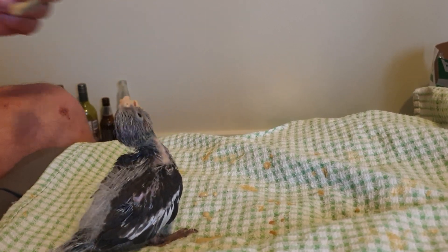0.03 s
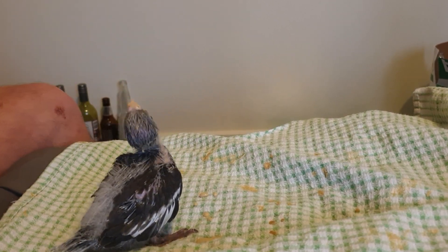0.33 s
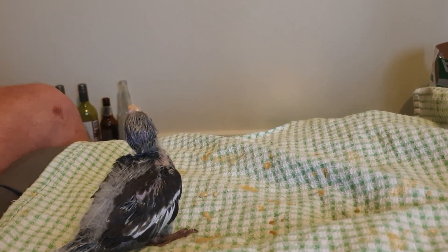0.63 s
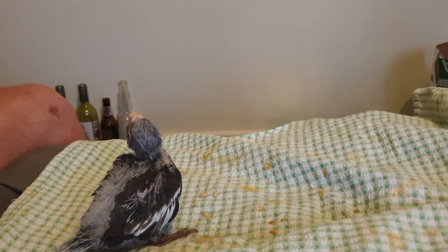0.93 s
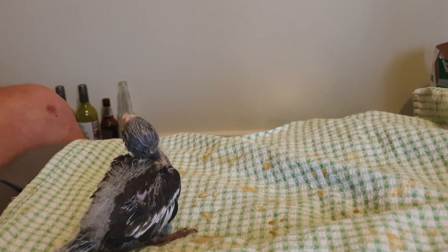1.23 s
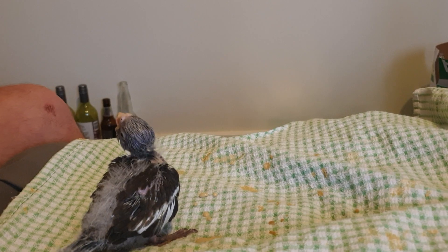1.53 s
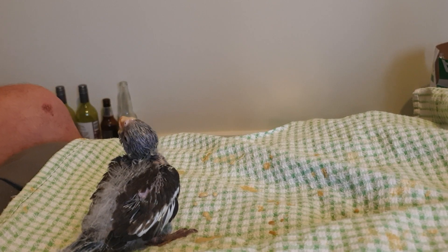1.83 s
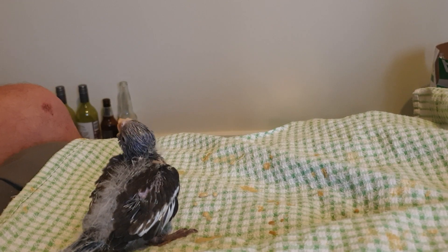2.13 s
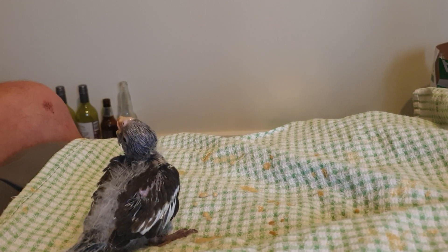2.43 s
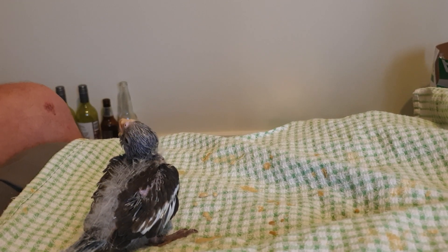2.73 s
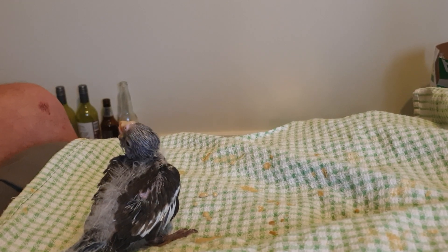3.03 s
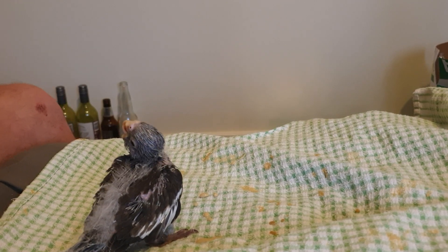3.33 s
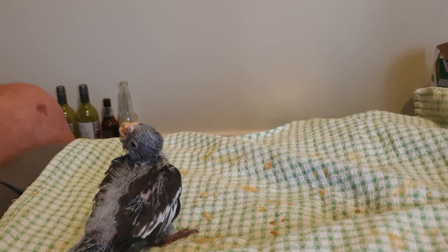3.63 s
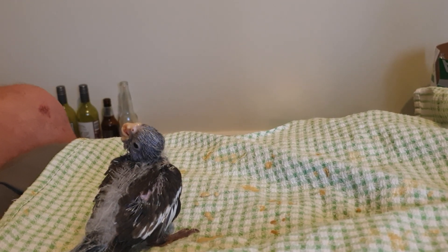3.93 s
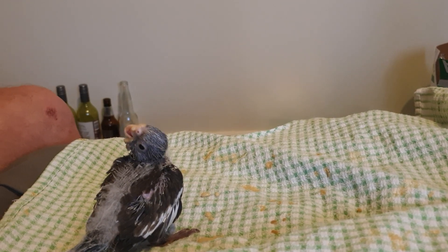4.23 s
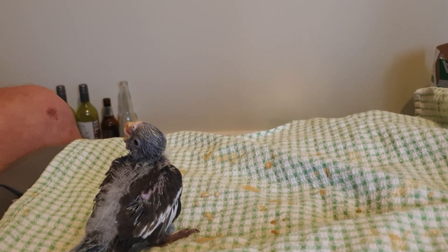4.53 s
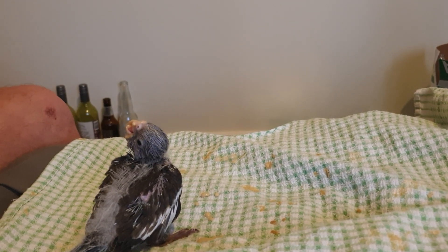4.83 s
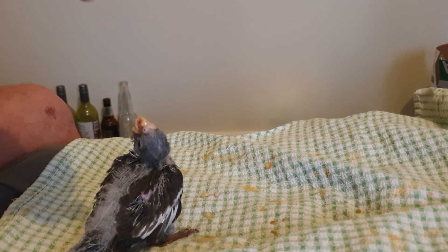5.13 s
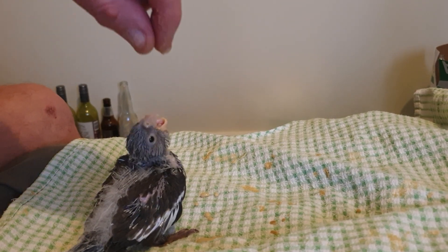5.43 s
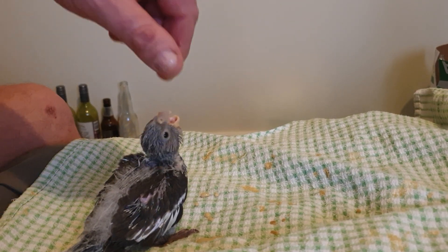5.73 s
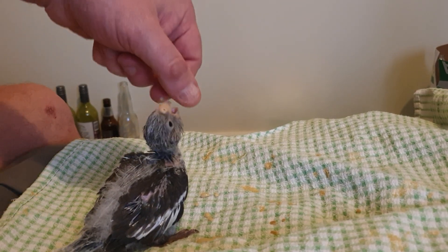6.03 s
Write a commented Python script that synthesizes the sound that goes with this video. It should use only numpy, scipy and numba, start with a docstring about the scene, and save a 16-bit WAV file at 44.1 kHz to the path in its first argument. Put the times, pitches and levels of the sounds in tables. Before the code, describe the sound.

A cockatiel chick begs close to the microphone in a small furnished room. A few short rasps come first, with a light clink of a small hard object. Then long, harsh, hissing calls follow one after another, separated by quick gasps. A dull knock on furniture sounds early in the run, a softer thud later, and a faint low hum slowly grows underneath.

```python
"""A cockatiel chick begs for food on a towel in a small room, close to a stereo microphone.
Its syrinx slaps shut irregularly, faster with more effort, and rings the windpipe and the beak
in long rasping strokes, with quick gasps between them. Around it a small hard thing clinks,
something knocks on the furniture, the bedding shifts, and a low hum hangs in the room."""
import sys
import numpy as np
from scipy import signal
from scipy.fft import rfft, irfft
from scipy.io import wavfile
from scipy.ndimage import uniform_filter1d, map_coordinates
from numba import njit

SR = 44100
rng = np.random.default_rng(int(sys.argv[2]) if len(sys.argv) > 2 else 0)


def materialize(psi):
    """Save the field psi as 16-bit PCM at rate SR to the path in sys.argv[1].

    A 1-D psi becomes a single channel; in a 2-D psi each row is a channel.
    """
    bounded = np.clip(np.atleast_2d(psi).T, -1, 1)
    quanta = np.round(bounded * 32767).astype(np.int16)
    wavfile.write(sys.argv[1], SR, quanta)


N = 268172
T = np.arange(N) / SR


def undb(db):
    """Decibels to gain."""
    return 10 ** (np.asarray(db) / 20)


def unit(x):
    """Scale to rms 1."""
    return x / np.sqrt(np.mean(x ** 2))


def curves(rows):
    """Each column after the first as a line through time."""
    times, *columns = np.transpose(rows)
    return [np.interp(T, times, column) for column in columns]


def latest(rows):
    """At every moment, the time since the latest event began and that event's other columns."""
    start, *columns = np.transpose(rows)
    which = np.maximum(np.searchsorted(start, T) - 1, 0)
    return [np.maximum(T - start[which], 0)] + [column[which] for column in columns]


def fade(start, t60):
    """Exponential decay from a moment on."""
    return (T >= start) * np.exp(-np.log(1000) * np.maximum(T - start, 0) / t60)


def colour(x, points, size=8192):
    """Minimum-phase filter through points of f/Hz, gain/dB."""
    hz, db = np.transpose(points)
    grid = np.maximum(np.arange(size // 2 + 1) * SR / size, 1)
    gain = undb(np.interp(np.log(grid), np.log(hz), db))
    cepstrum = irfft(np.log(gain))
    cepstrum[1:size // 2] *= 2
    cepstrum[size // 2 + 1:] = 0
    return signal.fftconvolve(x, irfft(np.exp(rfft(cepstrum))))[:len(x)]


@njit
def bandpass(x, hz, width):
    """State-variable band-pass whose centre and width may move every sample."""
    y, band, low = np.empty(len(x)), 0., 0.
    for i in range(len(x)):
        g, damping = np.tan(np.pi * hz[i] / SR), width[i] / hz[i]
        v = (band + g * (x[i] + 1e-18 - low)) / (1 + g * (g + damping))
        band, low = 2 * v - band, low + 2 * g * v
        y[i] = damping * v
    return y


def resonance(x, hz, width_hz, order=2):
    """A resonance made steep by repeating it, rms 1."""
    for _ in range(order):
        x = bandpass(x, hz * np.ones(N), width_hz * np.ones(N))
    return unit(x)


def struck(blows, modes):
    """Each blow rings the same decaying modes."""
    ring = sum(undb(db) * fade(0, t60) * np.sin(2 * np.pi * hz * T) for hz, db, t60 in modes)
    taps = np.zeros(N)
    for start, db, *_ in blows:
        taps[int(start * SR)] += undb(db)
    return signal.fftconvolve(taps, ring)[:N]


def place(x, lag, pan_db):
    """A near source at the microphone: the right side lags by `lag` samples and is pan_db softer."""
    right = map_coordinates(x, [np.arange(N) - lag], order=3, mode="nearest")
    return np.array([x * undb(pan_db / 2), right * undb(-pan_db / 2)])


def room(x, wet_db, t60, first_s=0.000708):
    """Reflections of a small furnished room, different on each side of the microphone."""
    walls = [(100, -8.5), (700, -2.0), (2000, -1.5), (6000, -2.5), (14000, -4.0)]  # f/Hz, gain/dB
    tails = [colour((rng.standard_normal(N) * fade(first_s, t60))[:SR // 2], walls) for _ in range(2)]
    return undb(wet_db) * np.array([signal.fftconvolve(x, h / np.linalg.norm(h))[:N] for h in tails])


def room_tone(db=-70, side_db=-9):
    """Still air, mostly alike on both sides."""
    # spectrum of the air: f/Hz, relative level/dB
    spectrum = [(25, -7), (70, 6.5), (130, 2), (250, -7), (500, -11.5), (1000, -14.5), (3000, -20),
                (6500, -26), (8300, -52), (10500, -21), (15000, -25)]
    mid, side = (unit(colour(rng.standard_normal(N), spectrum)) for _ in range(2))
    return undb(db) * (mid + undb(side_db) * side * np.array([[1], [-1]]))


def hum():
    """Narrow bands of low noise waver and slowly grow."""
    # tones of the hum: f/Hz, width/Hz, relative level/dB
    tones = [(50.5, 3.2, 0), (81.8, 14.4, -2.5), (100.5, 10, -8)]
    # its swell: t/s, level/dB
    swell = [(0.0, -72.5), (3.1, -68.5), (3.9, -65), (6.08, -55.5)]
    drone = sum(undb(db) * resonance(rng.standard_normal(N), hz, width) for hz, width, db in tones)
    return unit(drone) * undb(curves(swell)[0])


def bedding():
    """The bedding shifts with a soft, low rub."""
    # course of the rub: t/s, level/dB
    shift = [(3.7, -85), (3.92, -62.5), (4.06, -60), (4.13, -54.5), (4.18, -61), (4.26, -88)]
    return resonance(rng.standard_normal(N), hz=146, width_hz=132) * undb(curves(shift)[0])


def knocks():
    """Dull blows make the furniture boom; softer contact gives less treble."""
    # blows: t/s, level/dB, t60/s, low-pass f/Hz
    blows = [(1.853, -37.5, 0.1, 1890), (1.861, -35.5, 0.1, 1700), (1.873, -42.5, 0.43, 1500),
             (3.402, -48.5, 0.25, 149), (3.421, -62, 0.79, 218.1), (3.55, -56.5, 0.45, 100)]
    # spectrum of the thud: f/Hz, relative level/dB
    spectrum = [(35, -16), (60, -12), (90, 6.5), (130, -3.5), (180, 1), (300, -7.5), (450, -3), (620, -3),
                (1200, 1.5), (1500, -1.5), (1850, 8.5), (3000, -40)]
    # furniture modes: f/Hz, gain/dB, t60/s
    modes = [(99, -22, 0.16), (179, -13, 0.21), (241, -14, 0.15), (298, -17.5, 0.35), (434, -16, 0.14)]
    body = colour(rng.standard_normal(N), spectrum)
    thuds = np.zeros(N)
    for start, db, t60, top_hz in blows:
        soft = signal.butter(3, top_hz, fs=SR, output="sos")
        thud = signal.sosfilt(soft, body * fade(start, t60))
        thuds += undb(db) * thud / np.std(signal.sosfilt(soft, body))
    return thuds + struck(blows, modes)


def clinks():
    """A small hard thing taps and rattles, ringing faintly."""
    # taps: t/s, level/dB, t60/s
    taps = [(0.409, -57, 0.0093), (0.4815, -40, 0.013), (0.5741, -36.5, 0.033), (0.583, -54, 0.14),
            (0.594, -43.5, 0.097), (0.607, -50, .04), (0.619, -55, 0.21)]
    # spectrum of the contact: f/Hz, relative level/dB
    spectrum = [(600, -53), (1100, -21), (1600, -27), (2700, -19.5), (3100, -21), (3850, -7.5), (4900, -12),
                (6000, -11.5), (7200, -7.5), (8500, -20), (10700, -9.5), (13000, -11), (15500, -15.5)]
    # ringing modes: f/Hz, gain/dB, t60/s
    modes = [(1110, -28, 0.085), (2666, -28, 0.19), (4420, -22, 0.33), (6300, -30, 0.16), (6800, -29, 0.13),
             (11300, -44, 0.17)]
    contact = sum(undb(db) * fade(start, t60) for start, db, t60 in taps)
    return contact * unit(colour(rng.standard_normal(N), spectrum)) + struck(taps, modes)


def whistles(waver_hz=110):
    """Thin, unsteady whistles, and the chirps of the throat snapping shut."""
    # glides: t/s, length/s, start f/Hz, end f/Hz, level at half the peak amplitude/dB
    glides = [(0.0, 0.075, 2360, 2260, -61.5), (0.629, .028, 2560, 2380, -62),
              (2.396, 0.0064, 3475, 3280, -44), (2.572, 0.028, 12700, 11700, -68),
              (2.682, 0.15, 11400, 12500, -69), (4.35, 0.22, 12500, 14500, -67),
              (4.966, 0.0056, 3410, 3200, -40.5), (5.79, 0.0049, 3150, 3000, -45)]
    out = np.zeros(N)
    wobble = waver_hz * unit(uniform_filter1d(rng.standard_normal(N), size=60))
    for start, length, from_hz, to_hz, db in glides:
        along = np.clip((T - start) / length, 0, 1)
        hz = from_hz + (to_hz - from_hz) * along + wobble
        out += undb(db) * 2 * np.sin(np.pi * along) * np.sin(2 * np.pi * np.cumsum(hz) / SR)
    return out


def syrinx(rate_hz, jitter, scatter_db):
    """The syrinx slaps shut unevenly; gives the pulses and the seconds since the last one."""
    gap_draw, size_draw = rng.standard_normal((12000, 2)).T
    at = [0.]  # in samples
    while at[-1] < N:
        now = int(at[-1])
        at.append(at[-1] + SR / rate_hz[now] * np.exp(jitter[now] * gap_draw[len(at)]))
    at = np.array(at[:-1])
    size = undb(scatter_db * size_draw[:len(at)]) / np.sqrt(rate_hz[at.astype(int)])
    # a windowed sinc sets each slap between samples
    taps = at.astype(int)[:, None] + np.arange(-3, 5)
    offset = taps - at[:, None]
    shape = np.sinc(offset) * np.sinc(offset / 4)
    pulses = np.bincount(np.clip(taps, 0, N - 1).ravel(), (size[:, None] * shape).ravel(), N)
    last = np.maximum(np.searchsorted(at, np.arange(N)) - 1, 0)
    return -unit(pulses), np.abs(T - at[last] / SR)


def chick(gate, db, throat_hz, throat_db, upper_db, mouth_hz, mouth_db,
          beak_hz, beak_db, hiss_db, sizzle_hz, sizzle_db):
    """Slaps and puffs ring the fixed windpipe and moving throat, mouth and beak; gives voice, hiss."""
    # the harder the push, the faster the slaps: level/dB, slap rate/Hz
    effort = [(-58, 500), (-49.5, 620), (-45.5, 690), (-43, 830)]
    # windpipe response: f/Hz, relative gain/dB
    windpipe_response = [(250, -26), (520, -56.5), (800, -10.5), (1120, -6.5), (1400, 0.5), (1700, -2),
                         (2020, -0.5), (2350, -3.5), (2720, -7), (3150, -4.5), (3700, -10.5), (5000, -16.5),
                         (8000, -48)]
    # air hiss at the beak tip: f/Hz, relative level/dB
    hiss_spectrum = [(4000, -25), (5300, 9), (6800, 12), (8500, 4.5), (9500, 11), (10500, 6.5),
                     (11500, 11.5), (12500, 3), (13500, 1), (15500, 0.5)]
    # a soft call buzzes almost evenly; pushed hard, the beat breaks up
    jitter = np.interp(db, [-48.5, -44.5], [.17, .36])
    pulses, since_s = syrinx(np.interp(db, *np.transpose(effort)), jitter, scatter_db=1.5)
    puffs, eddies = (unit(np.exp(-since_s / 0.0026) * rng.standard_normal(N)) for _ in range(2))
    source = pulses + .5 * puffs
    throat = undb(throat_db) * resonance(source, throat_hz, width_hz=480, order=3)
    upper_throat = undb(upper_db) * resonance(eddies, 2.202 * throat_hz, width_hz=620)
    windpipe = unit(unit(colour(source, windpipe_response)) - throat + upper_throat)
    # a narrower gape rings lower and more sharply
    mouth_width = np.interp(mouth_hz, [3300, 4200], [1150, 1550])
    mouth = undb(mouth_db) * resonance(source / np.sqrt(mouth_width), mouth_hz, mouth_width, order=4)
    # the beak's resonance loses more energy, and so broadens, as it rises
    beak_width = np.interp(beak_hz, [5900, 6800], [1950, 2600])
    beak = undb(beak_db) * resonance(source / np.sqrt(beak_width), beak_hz, beak_width, order=4)
    # air torn at the beak tip hisses, with one sizzling band
    jet = puffs + 0.7 * pulses
    sizzle = undb(sizzle_db) * resonance(eddies, sizzle_hz, width_hz=2800)
    hiss = unit(colour(jet, hiss_spectrum)) + sizzle
    hiss *= undb(hiss_db) / np.hypot(1, undb(sizzle_db))
    return np.array([windpipe + mouth + beak, hiss]) * undb(db) * gate


def gasps(attack_s=.0005, hold_s=.022, sink_s=0.039, sink_hz=220):
    """Gulps of air between strokes burst open, hold briefly and fade as the mouth resonance sinks."""
    # gulps: t/s, level/dB, fade/(dB/s), mouth f/Hz, mouth gain/dB, beak f/Hz, beak gain/dB, hiss gain/dB
    gulps = [(1.610, -45.5, 240, 3145, -1.5, 6500, -12, -29), (2.507, -49, 230, 3300, -2, 5700, -37, -22),
             (3.323, -46, 85, 3500, -2, 5400, -21, -21.5), (4.201, -43, 150.5, 4083, -3.5, 5500, -14, -27),
             (5.078, -44, 199, 4200, -1.5, 5400, -8.5, -21), (5.904, -43, 216.5, 4540, -2, 5870, -5, -21)]
    age, db, fade_db_per_s, mouth_hz, mouth_db, beak_hz, beak_db, hiss_db = latest(gulps)
    gate = np.minimum(age / attack_s, 1)
    fading_s = np.maximum(age - hold_s, 0)
    sunk = np.minimum(fading_s / sink_s, 1)
    return chick(gate, db - fade_db_per_s * fading_s, throat_hz=702, throat_db=-13, upper_db=-2,
                 mouth_hz=mouth_hz - sink_hz * sunk, mouth_db=mouth_db,
                 beak_hz=beak_hz, beak_db=beak_db, hiss_db=hiss_db, sizzle_hz=11300, sizzle_db=5)


def rasps(gape_s=.11, beak_late_s=0.046, settle_s=0.28, catch_s=.004, catch_db=3.5):
    """Begging strokes swell and brighten as the gape widens, and catch as the throat snaps shut."""
    # strokes: start t/s, end t/s, full level/dB, attack/s, release/s, open throat f/Hz,
    # open mouth f/Hz, mouth gain/dB, settled beak f/Hz, beak sag/Hz, beak gain/dB, hiss gain/dB,
    # sizzle f/Hz, sizzle against hiss/dB
    strokes = [(0.036, 0.19, -45.5, 0.012, 0.066, 693, 4624, -1, 6150, 4, -3, -20.5, 10700, 3),
               (0.322, 0.408, -51.5, 0.024, 0.02, 702, 3400, -2, 6350, -14, -9.5, -28, 11000, -10),
               (0.416, 0.484, -50, 0.0029, 0.027, 705, 4004, 3.5, 6070, 0, -1, -28.5, 11000, -17),
               (0.773, 0.812, -60.5, 0.0059, 0.036, 950, 2600, 11, 6200, -4, -20, -26, 11000, -6),
               (0.830, 1.510, -44.5, 0.027, 0.0058, 934, 4260, -1.5, 5860, 450, -1.5, -18.5, 12150, 2),
               (1.694, 2.402, -44.5, 0.011, 0.001, 910, 4220, -1.5, 5690, 952, -3.5, -21, 12400, 0.5),
               (2.620, 3.212, -44.5, 0.022, 0.0035, 932, 4342, -1.5, 5749, 550, -6, -21, 12300, -1),
               (3.395, 4.100, -44, 0.023, 0.0023, 863, 4330, -1.5, 5850, 800, -5, -21.5, 12000, -3),
               (4.255, 4.975, -43.5, 0.028, 0.0019, 863, 4530, -2.5, 5980, 900, -6.5, -21.5, 12500, -1.5),
               (5.115, 5.797, -43, 0.021, 0.0011, 775, 4260, -4, 5400, -23, -8.5, -18, 11600, 6),
               (5.935, 6.100, -43, 0.022, .002, 770, 4850, -2.5, 6700, -600, -2, -18, 11500, -1)]
    # the chick turns and stretches to the hand, which bends its resonances:
    # t/s, mouth f ratio, mouth lift/dB, beak f ratio, beak lift/dB, hiss lift/dB, sizzle lift/dB
    stretch = [(5.27, 0.96, 0, 1.04, 1, 1.5, -4), (5.38, .88, 1.5, 0.93, -1.5, 2.5, -5),
               (5.47, 0.82, -8, 0.54, 6, 5.5, -9), (5.54, 0.81, -9, 0.67, 4, 2.5, -5),
               (5.595, 0.61, -10, 0.97, 5, 3, -9), (5.65, 0.66, -12, 1.245, 4.5, -5, -23),
               (5.79, 0.65, -6, 1.16, 9, 3.5, -25), (5.88, 1, -0.5, 1, 0.5, 0, 0)]
    (age, end, db, attack, release, throat_hz, mouth_hz, mouth_db,
     beak_hz, sag_hz, beak_db, hiss_db, sizzle_hz, sizzle_db) = latest(strokes)
    mouth_bend, mouth_lift, beak_bend, beak_lift, hiss_lift, sizzle_lift = curves(stretch)
    shut = np.exp(-age / gape_s)  # 1 closed, 0 wide open
    # the beak starts to ring a moment late, and its resonance takes a while to settle
    late = np.exp(-age / beak_late_s)
    unsettled = np.maximum(1 - age / settle_s, 0)
    catch = undb(catch_db * (T > end - catch_s))
    gate = (1 - np.exp(-age / attack)) * np.clip((end - T) / release, 0, 1) * catch
    return chick(gate, db - 3.5 * shut,
                 throat_hz=throat_hz + (618 - throat_hz) * shut, throat_db=-17, upper_db=-6,
                 mouth_hz=(mouth_hz - 667 * shut) * mouth_bend,
                 mouth_db=mouth_db - 8 * shut + mouth_lift,
                 beak_hz=(beak_hz + sag_hz * unsettled) * beak_bend,
                 beak_db=beak_db - 10.5 * late + beak_lift,
                 hiss_db=hiss_db + hiss_lift,
                 sizzle_hz=(sizzle_hz + (10400 - sizzle_hz) * shut) * beak_bend,
                 sizzle_db=sizzle_db + sizzle_lift)


def scene():
    """The chick close up and just left of centre, knocks and rumble further left, the room around."""
    # which way the head points: t/s, lag of the right side/samples, left minus right/dB
    head = [(0, 1.24, 2), (4.9, 1.3, 2), (5.4, 0.33, 0.5), (5.8, -1.14, 2.5)]
    voice, hiss = rasps() + gasps()
    near = voice + whistles() + clinks()
    knock = knocks()
    direct = place(near + hiss, *curves(head))
    direct += place(knock, lag=5.4, pan_db=5.0)
    direct += place(hum() + bedding(), lag=1.4, pan_db=6.0)
    close_wall = room(near + knock, wet_db=-10.8, t60=.07)
    far_walls = room(near + knock, wet_db=-11.0, t60=0.26)
    # the hiss beams away from the microphone, so much of it arrives by the walls
    thrown_hiss = room(hiss, wet_db=0.5, t60=0.24)
    return direct + close_wall + far_walls + thrown_hiss + room_tone()


def record(dry):
    """The recorder cuts the top steeply."""
    top_hz = 15800
    return signal.sosfilt(signal.ellip(8, .2, 70, top_hz, fs=SR, output="sos"), dry)


dry = scene()
out = record(dry)
materialize(out)
```